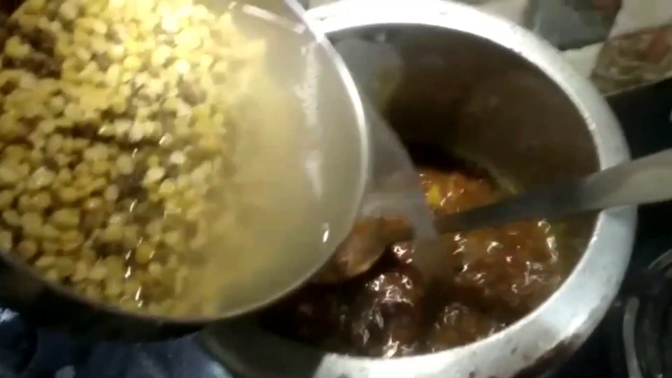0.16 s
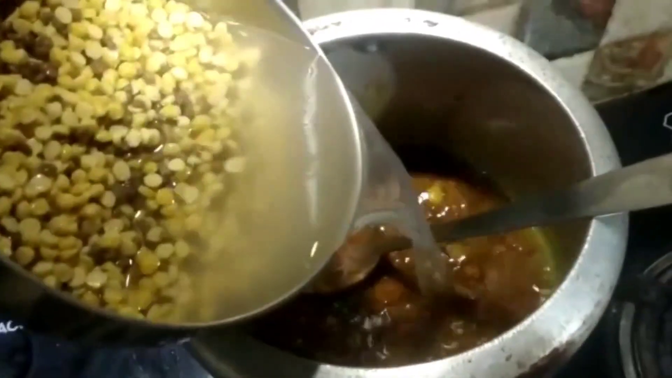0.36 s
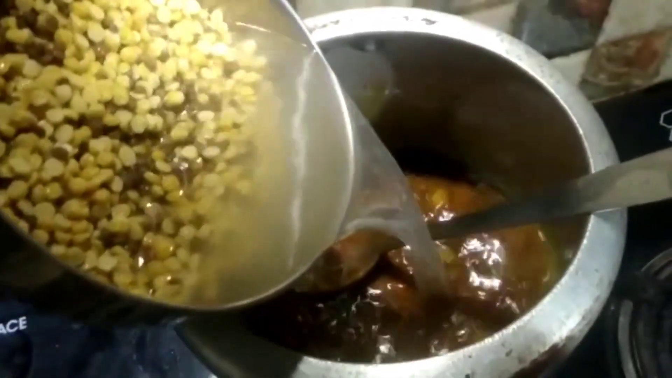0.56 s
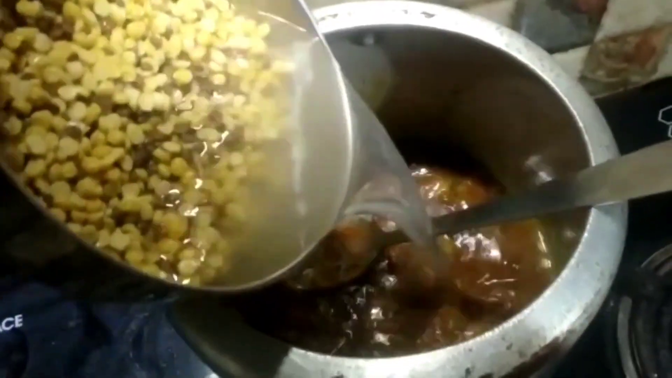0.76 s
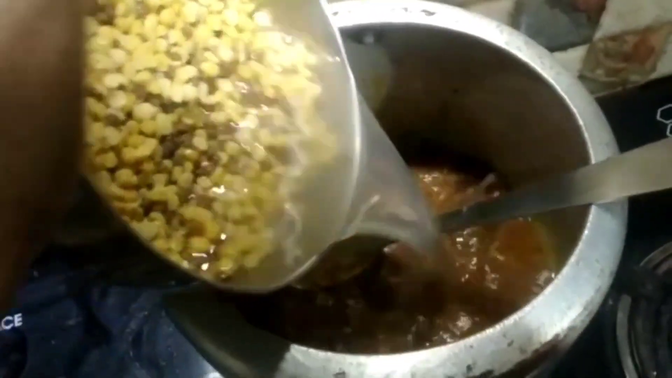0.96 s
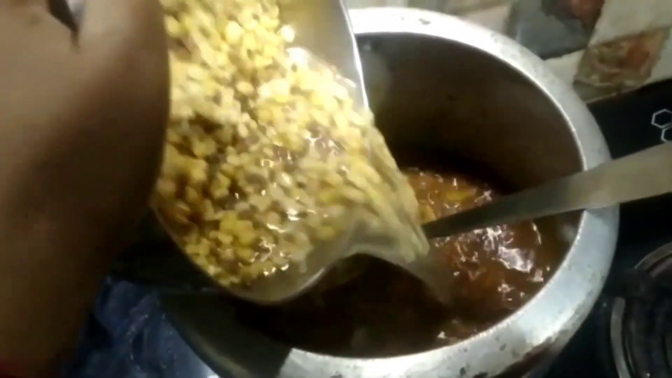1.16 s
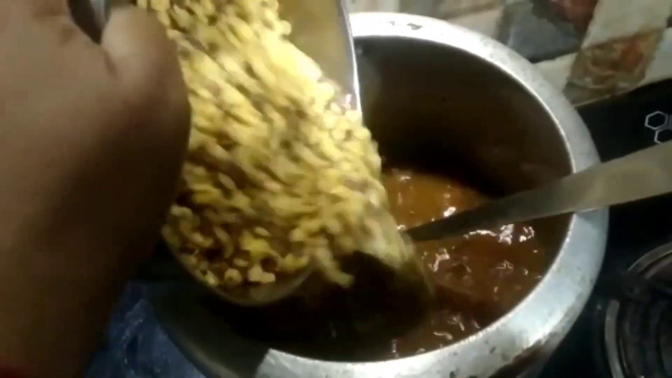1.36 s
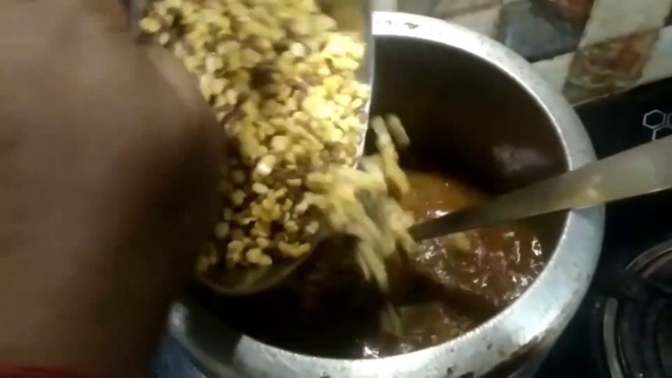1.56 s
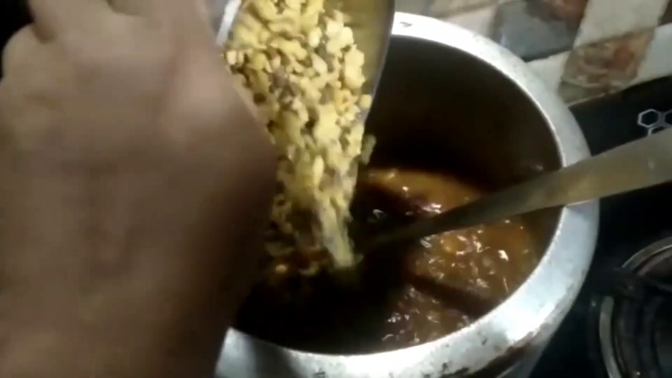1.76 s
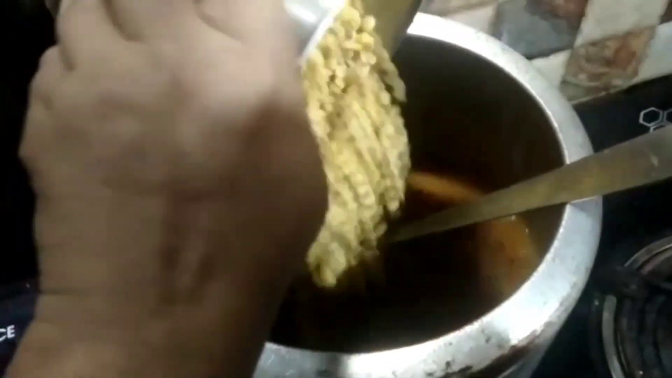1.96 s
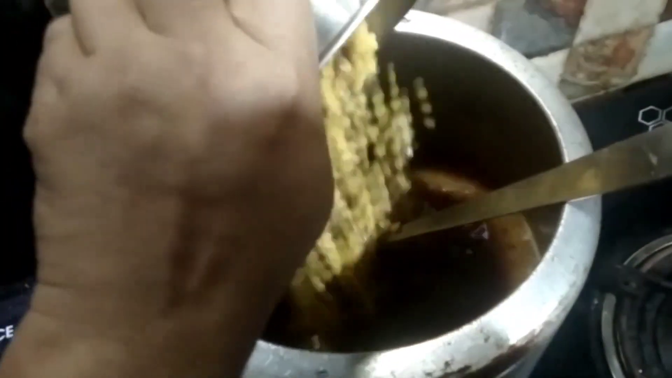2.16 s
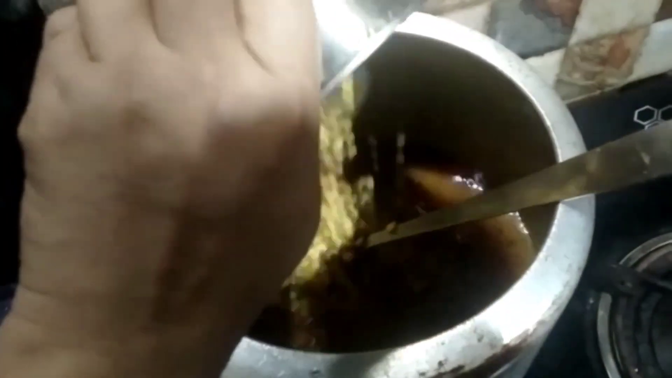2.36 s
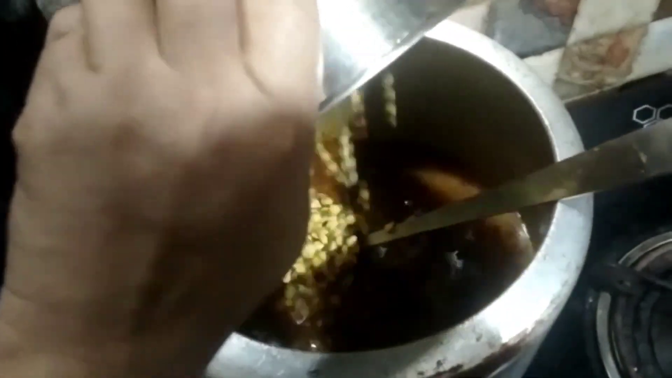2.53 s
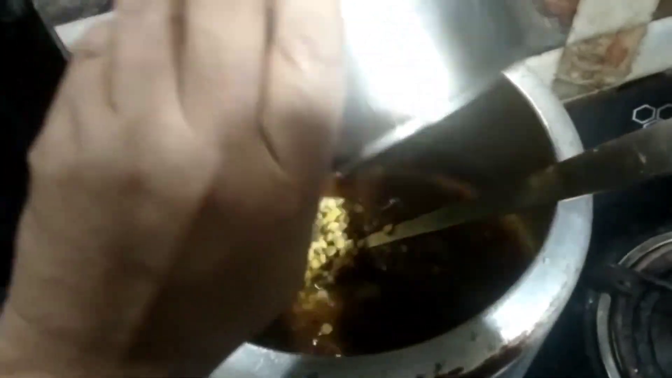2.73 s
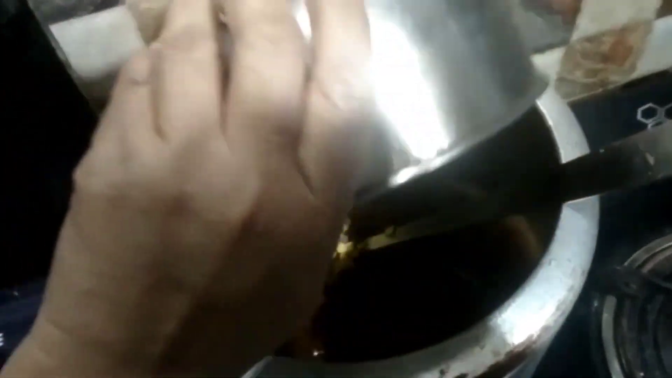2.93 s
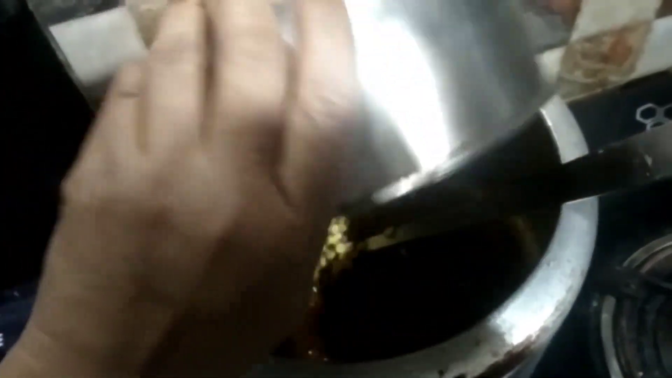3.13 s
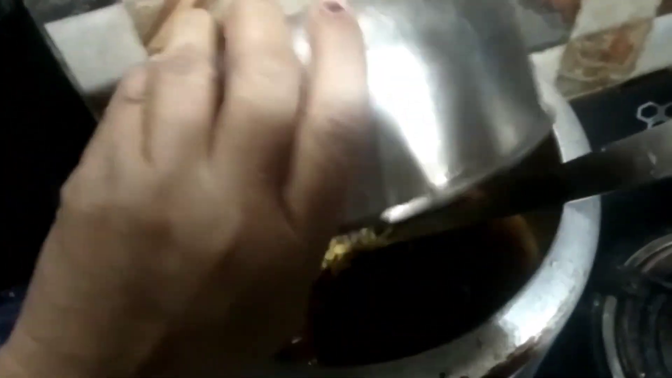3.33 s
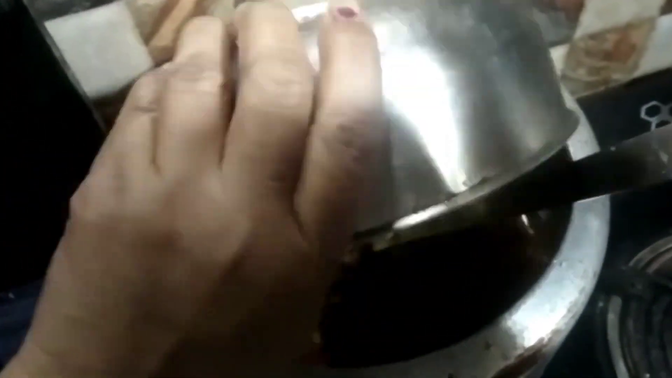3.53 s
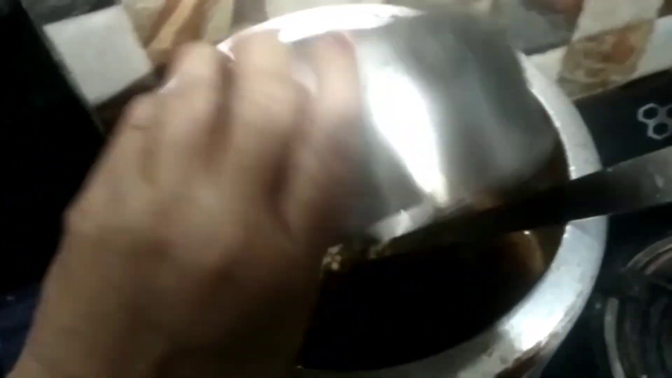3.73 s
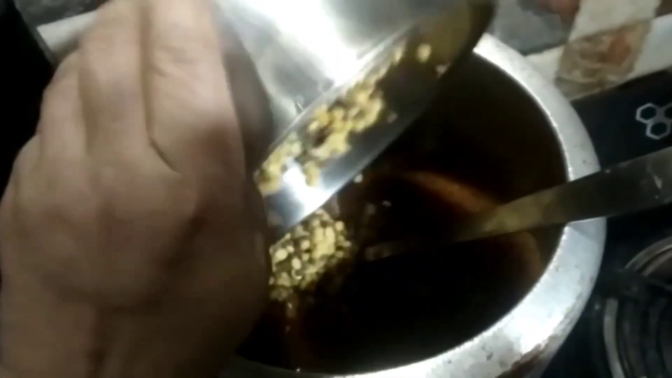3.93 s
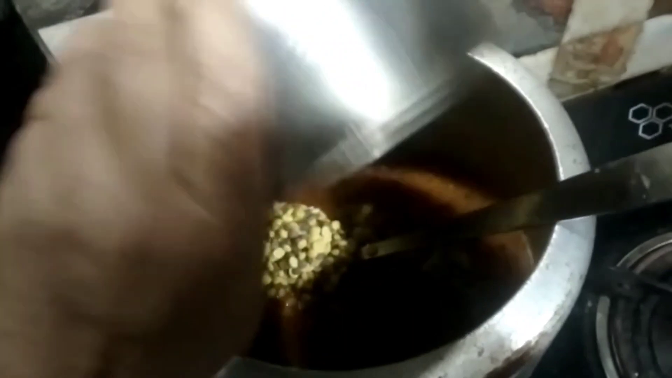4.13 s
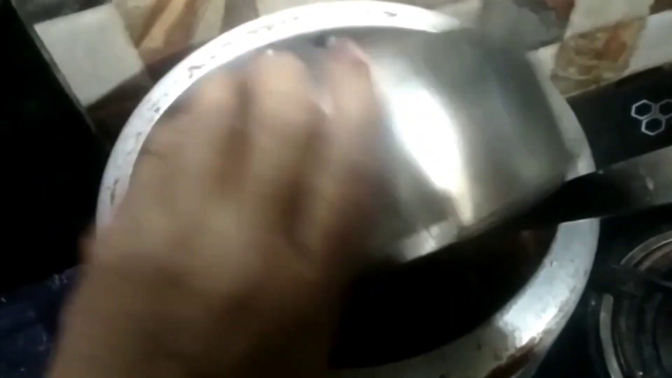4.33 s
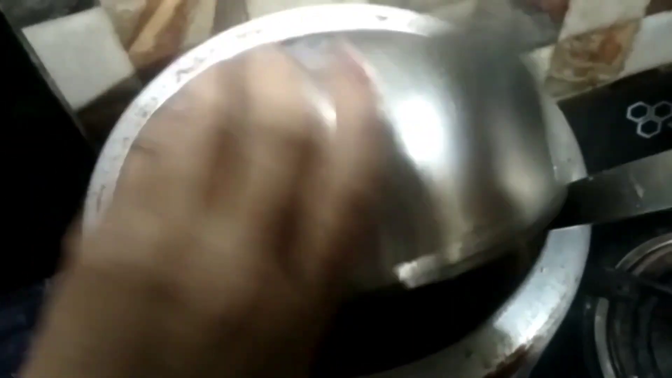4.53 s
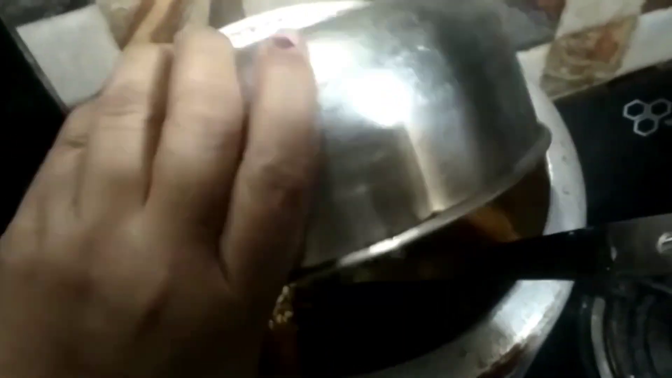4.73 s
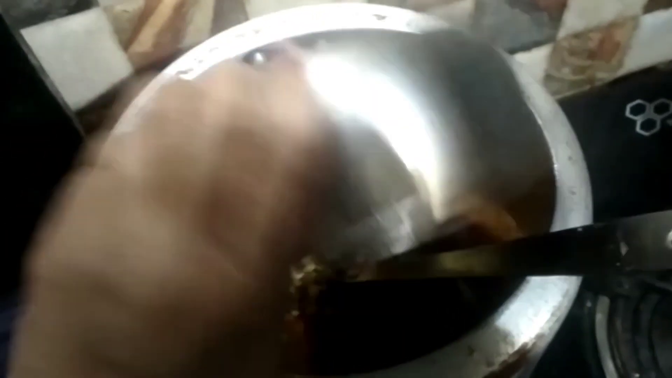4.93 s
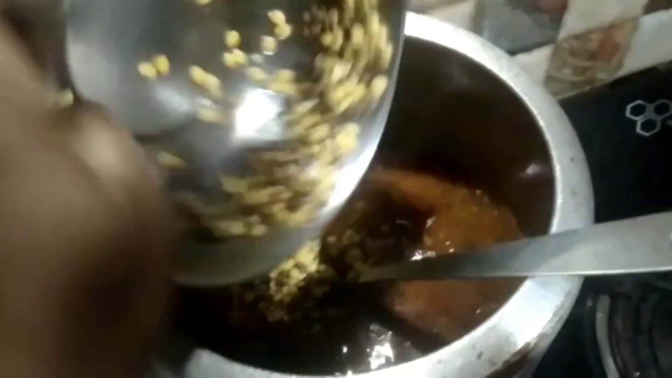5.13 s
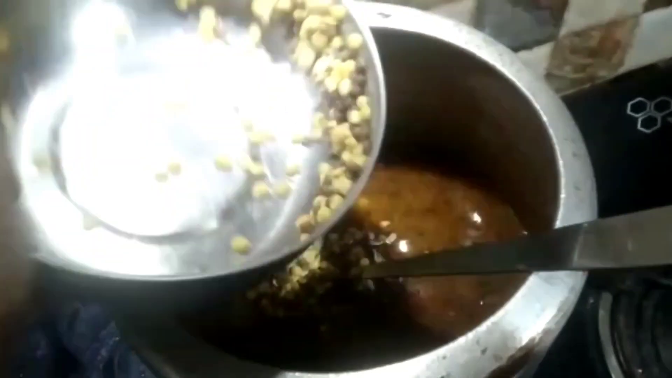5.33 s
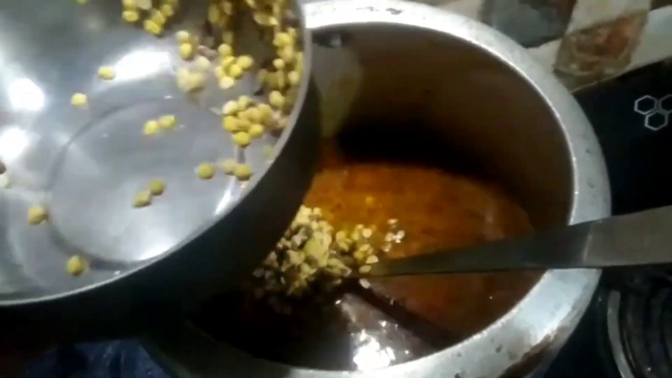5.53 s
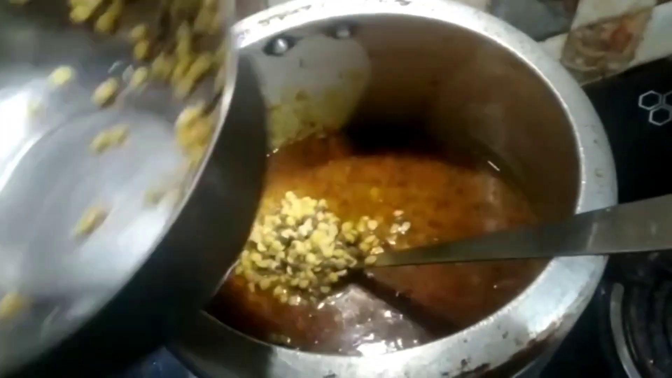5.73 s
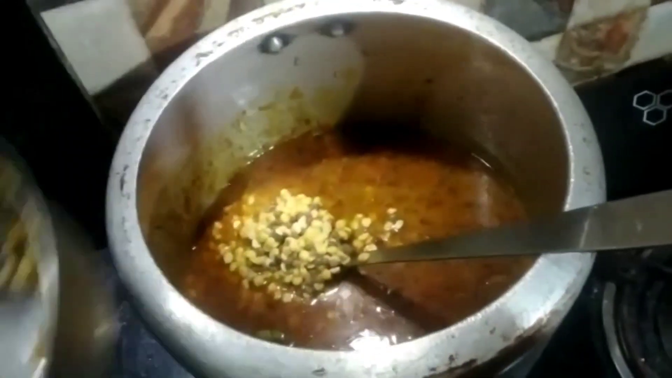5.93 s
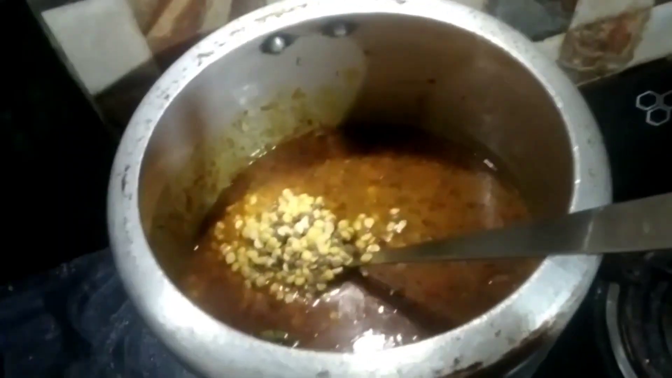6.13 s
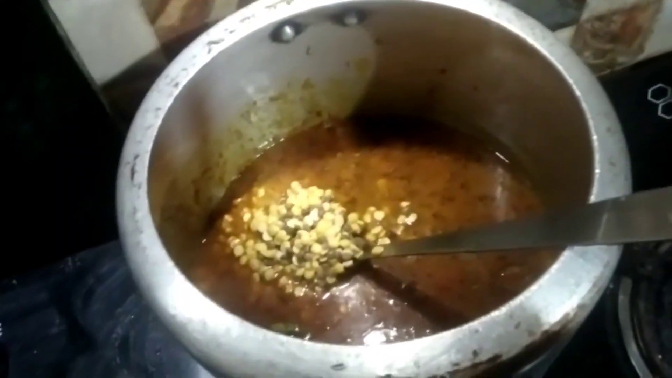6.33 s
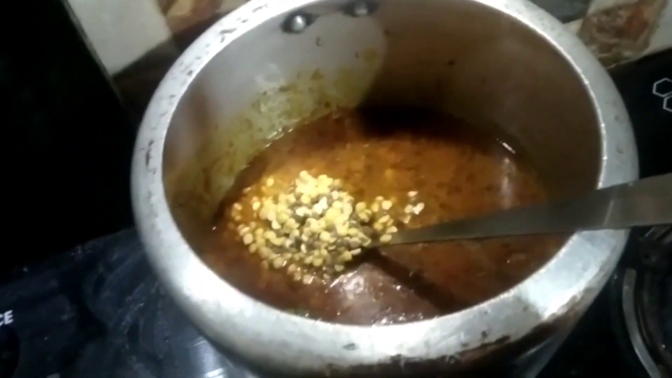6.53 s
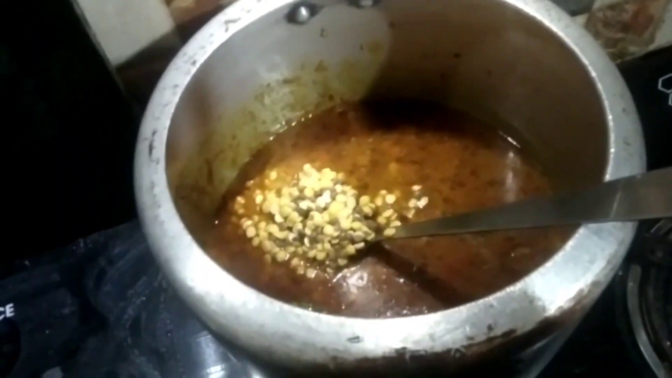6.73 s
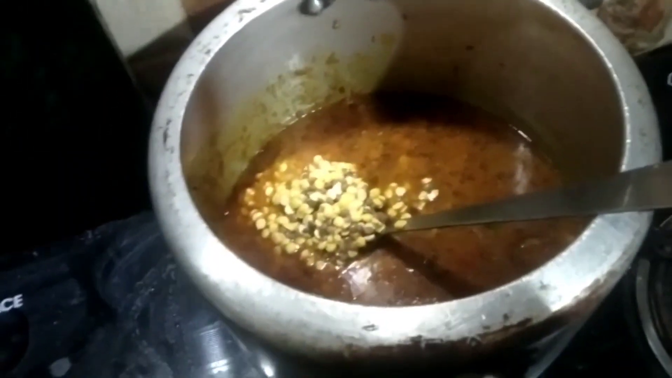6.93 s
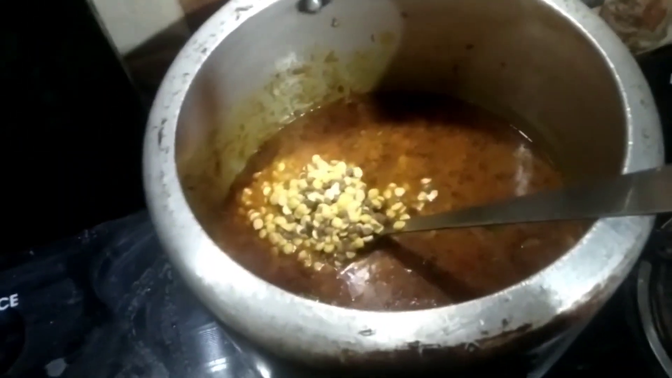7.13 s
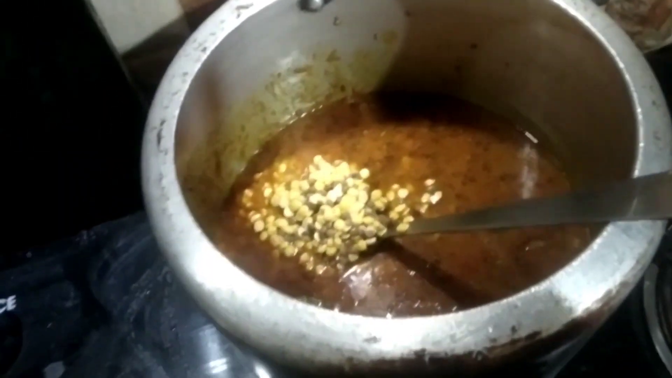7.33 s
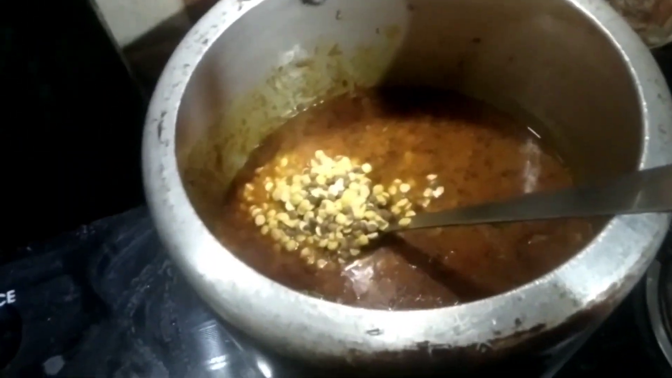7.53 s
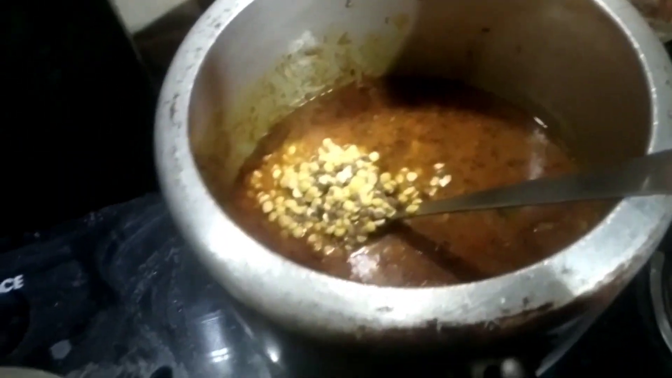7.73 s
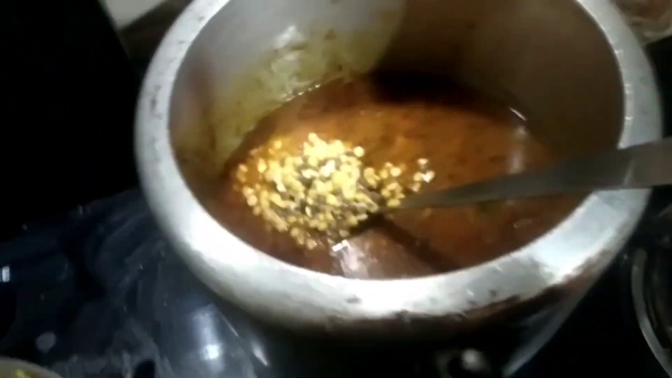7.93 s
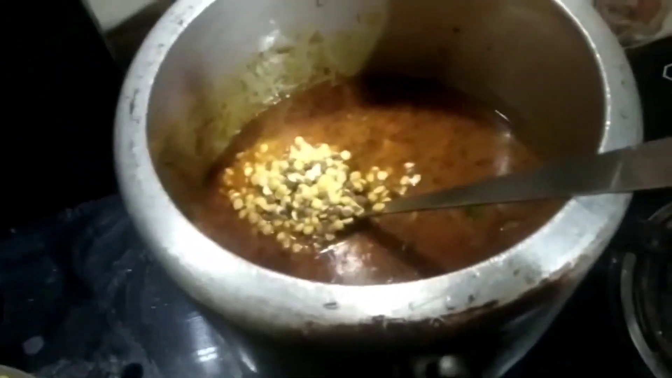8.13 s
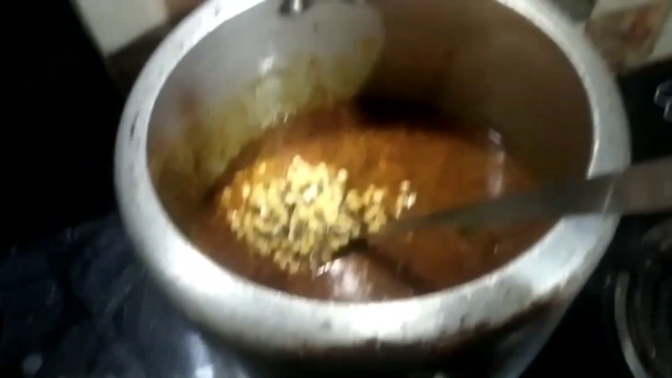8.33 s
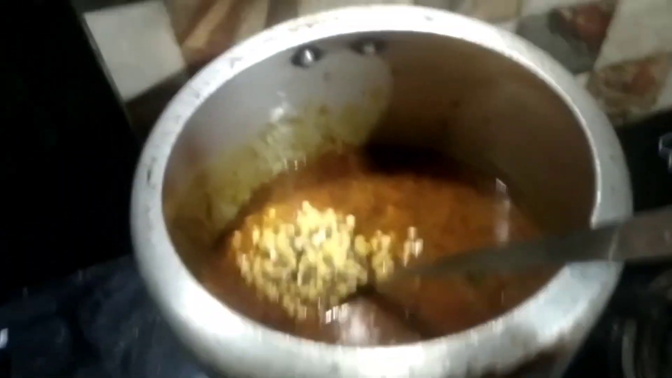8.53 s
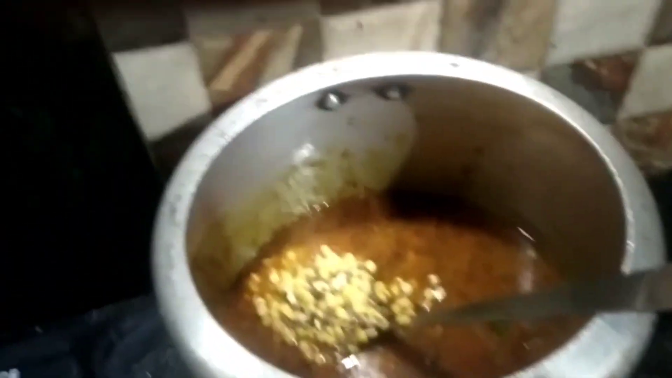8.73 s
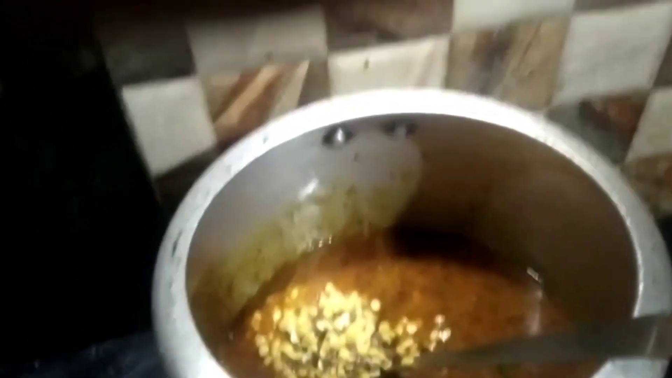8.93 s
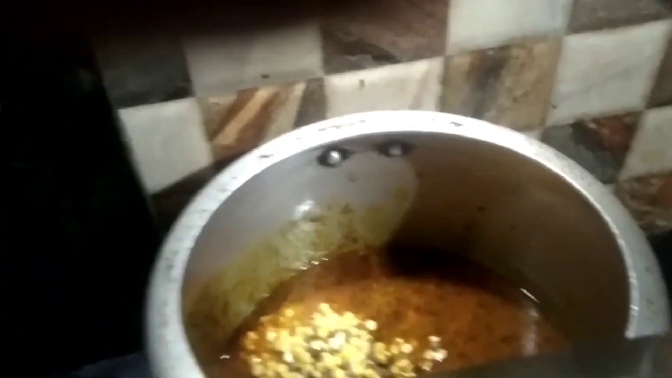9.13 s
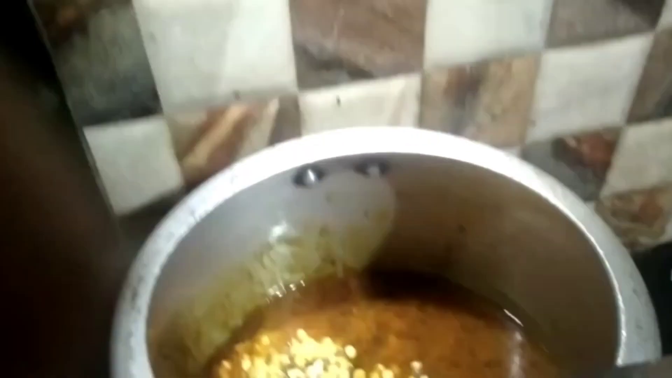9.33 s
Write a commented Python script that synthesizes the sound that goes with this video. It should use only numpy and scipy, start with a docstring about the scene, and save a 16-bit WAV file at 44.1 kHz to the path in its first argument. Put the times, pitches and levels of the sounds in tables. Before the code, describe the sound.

A fan drones steadily in a small kitchen, heard from two microphones just above the stove. From the start, water runs into a hot pressure cooker: a bright hiss flares and slowly cools, while the stream gurgles in surges with hollow plops, soft slaps and crackling spits. The water thins around 1.2 seconds; from 1.5 to 2.6, clumps of wet lentils slide in with splashes, fresh hiss and tiny ticks on steel. The sizzle sinks to a simmer. From about 3.1 the steel bowl touches the rim, then clanks hard in clusters near 3.75-4.0, 4.3-4.4 and 4.7, with short choked rings, scrapes and squeaks. A few lentils tick at 5.3 and a faint knock follows at 5.5. At 6.5 the bowl lands on the counter with a duller metallic clunk and small rattles to 6.7. Quiet simmering continues, with spits near 7.6 and 8.7 and a last light knock at 8.65.

```python
"""Throughout, a fan drones in a small kitchen: noise with narrow bands. Two close microphones listen.
Water from a steel bowl runs into a hot pressure cooker: hissing noise flares, air pockets ring as gliding tones.
Clumps of soaked lentils follow with splashes and fresh hiss; the sizzle sinks to a simmer.
The bowl is knocked against the rim and the spoon standing in the cooker: dying metal modes ring over noise.
It is set down on the counter with duller modes; the simmer goes on, with a late spit and a last light knock."""
import sys
import numpy as np
from scipy import signal
from scipy.fft import rfft, irfft, next_fast_len
from scipy.io import wavfile

SR = 44100
rng = np.random.default_rng(int(sys.argv[2]) if len(sys.argv) > 2 else 0)


def to_wav(s):
    """Save 16-bit WAV."""
    ch = np.atleast_2d(s).T  # columns
    pcm = np.round(np.clip(ch, -1, 1) * 32767)  # PCM
    wavfile.write(sys.argv[1], SR, pcm.astype(np.int16))


N = 418509
TIME = np.arange(N) / SR
CUTOFF_HZ = 15700  # top of the crowd of metal modes and of the finished sound
SHADOW_HZ = 3950  # above this pitch the two microphones hear differently


def from_db(db):
    """Turn decibels into gain."""
    return 10 ** (np.asarray(db) / 20)


def rms_one(x):
    """Scale a sound to unit power."""
    return x / np.sqrt(np.mean(x ** 2) + 1e-20)


def in_time(rows):
    """Read each column of a timed table at every sample."""
    s, *columns = np.transpose(rows)
    return [np.interp(TIME, s, column) for column in columns]


def at_hz(points, hz):
    """Read a table of (pitch, value) along log frequency."""
    at, value = np.transpose(points)
    return np.interp(np.log(hz + 1e-3), np.log(at), value)


def filtered(x, gain):
    """Apply a gain that depends on frequency."""
    size = next_fast_len(x.shape[-1])
    spectrum = rfft(x, size) * gain(np.fft.rfftfreq(size, 1 / SR))
    return irfft(spectrum, size)[..., :x.shape[-1]]


def coloured(x, spectrum):
    """Shape a sound with a table of decibels over frequency."""
    return filtered(x, lambda hz: from_db(at_hz(spectrum, hz)))


def white(size):
    """Make two unrelated noises of 0 dB per Hz."""
    return rng.standard_normal((2, size)) * np.sqrt(SR / 2)


def drift(rate, size=N):
    """Wander by chance with unit power, taking a new aim `rate` times a second."""
    knots = rng.standard_normal(4000)
    return rms_one(np.interp(TIME[:size] * rate, np.arange(len(knots)), knots))


def grains(per_s, spread_db):
    """Scatter uneven random clicks that reach each channel with a strength of their own."""
    born = rng.random(N) < per_s / SR
    sizes = from_db(spread_db * np.minimum(rng.exponential(1, N), 4))
    return rms_one(born * sizes * rng.standard_normal((2, N)))


def swell(middle_s, length_s):
    """Rise and fall in the shape of a bell curve."""
    return np.exp(-2 * ((TIME - middle_s) / length_s) ** 2)


def add(out, s, sound):
    """Mix a sound in, starting at the given second."""
    at = int(s * SR)
    out[:, at:at + sound.shape[1]] += sound[:, :N - at]


def two_places(hz):
    """Phases at two places: a quarter turn apart for long waves, with an added chance for short ones."""
    quarter_turn = np.array([[0], [np.pi / 2]])
    return quarter_turn + 2 * np.pi * rng.random((2, 1)) * (hz > SHADOW_HZ)


def ringing(hz, t60, t):
    """Ring one mode that dies by 60 dB in t60 seconds, starting at a chance phase."""
    phase = np.float32(2 * np.pi * (hz * t + rng.random()) + two_places(hz))
    return np.exp(-np.log(1000) * t / t60) * np.sin(phase)


def puffs(events, width, rise_s, t60):
    """Play short bursts of noise around a loose pitch; width is a share of that pitch."""
    out, t = np.zeros((2, N)), TIME[:SR // 4]
    for s, db, centre in events:
        puff = filtered(white(len(t)), lambda hz: 1 / (1 + ((hz / centre - centre / (hz + 1)) / width) ** 2))
        envelope = from_db(db - 60 * t / t60) * (1 - np.exp(-t / rise_s))
        add(out, s, envelope * rms_one(puff))
    return out


# the fan's smooth rush of air: pitch_hz, level_db (per Hz)
FAN_RUSH = [(20, -73), (55, -101), (85, -76.5), (130, -79), (165, -72), (250, -74.5), (370, -70),
            (480, -67), (680, -76.5), (1600, -73.5), (2100, -83), (3200, -80.5), (4500, -83), (9000, -118)]
# the fan's drone and the hollows it excites: pitch_hz, width_hz, level_db
FAN_DRONE = [(84.1, 5, -53.5), (115.5, 18.4, -48), (144.5, 2.5, -57.5), (203.9, 11, -46.5),
             (227.6, 11.7, -48), (257.5, 25, -49), (288, 6.2, -47), (312.2, 13.7, -46.5),
             (418.8, 31.5, -46.5), (778.5, 82, -47.5), (1072, 8.8, -55), (1780, 33, -53.5),
             (2227, 240, -55), (2543, 32, -57.5)]


def fan():
    """Moving air makes broad noise, and hollows pick out narrow, wavering bands of it."""
    def bands(hz):
        power = 0
        for centre, width, db in FAN_DRONE:
            power = power + from_db(db) ** 2 / width / (1 + (2 * (hz - centre) / width) ** 4)
        return np.sqrt(power)
    return coloured(white(N), FAN_RUSH) + filtered(white(N), bands)


# stray lentils skittering in the bowl: start_s, level_db (before rise and fading), pitch_hz
LENTIL_TICKS = [(1.779, -38, 9700), (2.238, -41, 11500), (2.477, -36, 7250), (2.478, -48, 12500),
                (5.268, -36, 5650), (5.27, -51, 12500), (5.52, -57, 12500), (8.65, -62, 12500)]


def skitters():
    """Hard little lentils tick on steel: very short bursts of mostly high noise."""
    return puffs(LENTIL_TICKS, width=0.3, rise_s=0.00046, t60=0.053)


# bubbles bursting on the hot wall: start_s, peak_db, pitch_hz
LOUD_SPITS = [(.906, -25, 3980), (.948, -29, 3950), (1.549, -32, 5640), (1.773, -24, 4600),
              (1.776, -27, 4850), (1.964, -25.5, 4160), (2.141, -30, 5300), (2.477, -30, 6740),
              (7.578, -37, 4960), (8.691, -35, 4930)]
SPIT_WAVER, SPIT_WAVER_PER_S = .035, 1200  # as a share of the pitch; new aims per second


def spits(count=45, until_s=2.5, small_db=-35, fading_db_per_s=3, low_hz=3900, high_hz=7500,
          rise_s=.003, t60=0.027):
    """Bubbles tick as they burst on the hot wall: a few loud ones, and many small ones during the pour."""
    out, t = np.zeros((2, N)), TIME[:SR // 20]
    small = []
    for when, size in rng.random((count, 2)):
        start_s = until_s * when
        small.append((start_s, small_db - fading_db_per_s * start_s, low_hz * (high_hz / low_hz) ** size))
    shape = (1 - np.exp(-t / rise_s)) ** 2 * from_db(-60 * t / t60)
    for s, db, hz in LOUD_SPITS + small:
        # the tearing film roughens the note
        pitch = hz * (1 + SPIT_WAVER * drift(SPIT_WAVER_PER_S, size=len(t)))
        phase = 2 * np.pi * (np.cumsum(pitch) / SR + rng.random((2, 1)))
        add(out, s, from_db(db) * shape / shape.max() * np.sin(phase))
    return out


# gulps of water and lentils slapping the gravy: start_s, level_db (before rise and fading), pitch_hz
GRAVY_SLAPS = [(.21, -30.5, 1410), (.435, -32, 1600), (.7, -37, 800), (.96, -48, 1400), (1.035, -37, 1190),
               (1.59, -41, 910), (1.785, -47, 1100), (2.135, -40, 1200), (2.215, -33.5, 1000),
               (2.485, -40, 900)]


def slaps():
    """A gulp slapping the gravy makes a soft, wide burst of noise."""
    return puffs(GRAVY_SLAPS, width=0.99, rise_s=.004, t60=0.24)


# air pockets closed in where the stream plunges:
# start_s, level_db (relative, before rise and fading), pitch_hz (before glide and waver)
AIR_POCKETS = [(.04, -20, 197), (.118, -19, 285), (.24, -31, 920), (.358, -26, 270), (.444, -23, 1530),
               (.486, -17, 200), (.515, -42, 330), (.69, -33, 447), (.72, -30, 380), (.728, -27, 617),
               (.735, -17, 303), (.815, -45, 830), (.924, -23, 287), (.992, -31, 758), (1.06, -38, 447),
               (1.14, -33, 221), (1.207, -43, 424), (1.36, -28, 765), (1.42, -38, 742), (1.638, -40, 418),
               (1.742, -27, 234), (1.76, -23, 420), (1.885, -31, 455), (2.178, -24, 295), (2.212, -24, 223),
               (2.24, -25, 800), (2.51, -24, 424)]


def plops(rise_s=0.0065, t60=0.15, glide_per_s=1.47, waver=0.042, level_db=-3.5):
    """A trapped pocket of air wobbles and rings, rising in pitch as it nears the surface."""
    out, t = np.zeros((2, N)), TIME[:SR // 5]
    for s, db, hz in AIR_POCKETS:
        pitch = hz * (1 + glide_per_s * t + waver * drift(130, size=len(t)))
        tone = np.sin(2 * np.pi * np.cumsum(pitch) / SR + np.array([[0], [np.pi / 2]]))
        envelope = from_db(level_db + db - 60 * t / t60) * (1 - np.exp(-t / rise_s))
        add(out, s, tone * envelope)
    return out


# clumps of wet lentils sliding in, which splash here and set the pot hissing in frying():
# middle_s, length_s, splash_db (relative, as in flow), hiss_db
LENTIL_CLUMPS = [(1.56, 0.17, -38.5, -40), (1.75, 0.21, -40, -40.5), (1.993, 0.86, -41.5, -45.5),
                 (2.267, 0.28, -39.5, -37), (2.535, 0.068, -36.5, -46), (3.62, 0.19, -51, -46)]
# the water runs off first, in surges as it sloshes in the bowl, then dries up; levels are relative
STREAM_DB, STREAM_SAG_DB_PER_S, STREAM_END_S, STREAM_RELEASE_DB_PER_S = -34.5, 2, 1.24, 39
SURGE_PERIOD_S, SURGE_DB = 0.237, 1.5


def flow():
    """Strength of what lands in the gravy: surging water, then clumps of lentils, added as power."""
    surge_db = SURGE_DB * np.cos(2 * np.pi * TIME / SURGE_PERIOD_S)
    release_db = STREAM_RELEASE_DB_PER_S * np.maximum(TIME - STREAM_END_S, 0)
    drying_db = STREAM_SAG_DB_PER_S * TIME + release_db
    water = from_db(STREAM_DB + surge_db - drying_db) ** 2
    clumps = sum((from_db(splash_db) * swell(s, length)) ** 2 for s, length, splash_db, _ in LENTIL_CLUMPS)
    return np.sqrt(water + clumps)


# colour of the splash inside the hollow cooker: pitch_hz, level_db (relative)
GRAVY_COLOUR = [(25, -71), (100, 12.5), (155, -8), (200, 16), (310, -7), (365, 3.5), (430, 11.5),
                (620, -6.5), (790, 4), (1250, -9.5), (1550, 4), (2100, -10.5), (3300, 2), (5000, -101)]


def pour(level_db=2.0, bubbles_per_s=45, cycles=22, splash_db=4.0, slosh_db=1.0):
    """The stream traps bubbles of 14 sizes; they ring over its splash inside the hollow of the cooker."""
    bubbles = np.zeros((2, N))
    for hz in np.geomspace(250, 3000, 14):
        # a resonator that fades by 60 dB in `cycles` periods, struck bubbles_per_s times a second
        radius = from_db(-60 * hz / (cycles * SR))
        angle = 2 * np.pi * hz / SR
        births = rng.random(1200) * 1200 / bubbles_per_s * SR
        strengths = rng.standard_normal((2, len(births)))
        clicks = np.zeros((2, N))
        clicks[:, births[births < N].astype(int)] = strengths[:, births < N]
        resonance = [1, -2 * radius * np.cos(angle), radius * radius]
        rung = signal.lfilter([1, 0, -1], resonance, clicks + 1e-18)
        bubbles += np.sqrt(hz) * rms_one(rung)
    bubbles = rms_one(coloured(bubbles, GRAVY_COLOUR))
    splash = rms_one(coloured(grains(1500, spread_db=-0.5), GRAVY_COLOUR))
    mixed = rms_one(bubbles + from_db(splash_db) * splash)
    return flow() * from_db(level_db + slosh_db * drift(22.28)) * mixed


# colours of the hiss and of the fine spray above it: pitch_hz, level_db (relative)
HISS_COLOUR = [(30, -21), (90, -4.5), (1800, -6), (2600, -8), (3100, -46), (3550, -10.5), (4300, 2.5),
               (5300, 3), (6500, -1), (7700, -5), (8300, -21.5), (10000, -88)]
SPRAY_COLOUR = [(7500, -64), (8800, 6.5), (11000, 5), (14000, 1), (16000, -18)]
# the simmer that remains, as the microphones move about the cooker:
# time_s, level_db, left_minus_right_db (treble of all the frying)
SIMMER_PATH = [(0, -35.5, 2), (2.6, -43, 1), (3.4, -44, -2), (5.0, -46, -3.5), (7.8, -46.5, -5.5),
               (8.15, -46.5, -6), (9.1, -46, -7.5), (9.45, -49, -6)]
# the first water flares up on the hot metal and cools it at a steady rate
FLARE_DB, COOLING_DB_PER_S = -25, 12
# fine spray relative to the hiss
FLARE_SPRAY_DB, CLUMP_SPRAY_DB, SIMMER_SPRAY_DB = -18.5, -19, -29


def frying(bursts_per_s=3500, spread_db=-1.0, steam_db=4.5, flutter_db=1.5):
    """Countless steam bubbles burst in the oil over a smooth jet of steam; flare, clumps and simmer add power."""
    simmer_db, pan_db = in_time(SIMMER_PATH)
    simmer = from_db(simmer_db) ** 2
    flare = from_db(FLARE_DB - COOLING_DB_PER_S * TIME) ** 2
    clumps = sum((from_db(hiss_db) * swell(s, length)) ** 2 for s, length, _, hiss_db in LENTIL_CLUMPS)
    hiss = np.sqrt(flare + clumps + simmer)
    spray_power = flare * from_db(FLARE_SPRAY_DB) ** 2
    spray_power = spray_power + clumps * from_db(CLUMP_SPRAY_DB) ** 2
    spray_power = spray_power + simmer * from_db(SIMMER_SPRAY_DB) ** 2
    crackle = grains(bursts_per_s, spread_db) + from_db(steam_db) * rms_one(white(N))
    crackle = crackle * from_db(flutter_db * drift(45))
    sound = hiss * rms_one(coloured(crackle, HISS_COLOUR))
    sound = sound + np.sqrt(spray_power) * rms_one(coloured(crackle, SPRAY_COLOUR))
    return shaded(microphones(sound), pan_db)


# the bowl's edge sliding briefly on the rim: start_s, level_db (before rise and fading), pitch_hz
RIM_SCRAPES = [(3.36, -34.5, 6300), (4.725, -32, 6050)]


def scrapes():
    """An edge sliding on the rim makes a short burst of noise around a high pitch."""
    return puffs(RIM_SCRAPES, width=0.13, rise_s=0.011, t60=0.19)


# the edge sticking and slipping on rim or counter:
# start_s, length_s (until release), level_db, pitch_hz (before waver)
EDGE_SQUEAKS = [(3.772, .018, -28, 2340), (3.970, .026, -18.5, 645), (4.703, .025, -23, 650),
                (4.752, .012, -33, 5650), (4.754, .043, -30, 2187), (4.757, .028, -36, 6740),
                (4.771, .013, -30, 5350), (6.689, .010, -36, 7200)]


def squeaks(waver=0.013, attack_s=0.0013, release_db_per_s=1100):
    """Friction keeps one mode of the bowl singing for a moment."""
    out, t = np.zeros((2, N)), TIME[:SR // 8]
    for s, length, db, hz in EDGE_SQUEAKS:
        release_db = release_db_per_s * np.maximum(t - length, 0)
        level = from_db(db - release_db) * (1 - np.exp(-t / attack_s))
        pitch = hz * (1 + waver * drift(118, size=len(t)))
        phase = 2 * np.pi * np.cumsum(pitch) / SR + two_places(hz)
        add(out, s, level * np.sqrt(2) * np.sin(phase))
    return out


# what colours a blow: pitch_hz, base_db, thud_share (0 to 1), hardness_share (0 to 1)
BLOW_TONE = [(396, 0.5, 0.85, 0.15), (920, -1.5, 0.065, 0.033), (2420, -5, 0.025, 0.16),
             (5700, -2.5, 0.027, 0.8)]
# the bowl bounces back on its flank, duller than its edge struck: pitch_hz, level_db (added)
FLANK_TONE = [(420, 5), (950, 3), (2300, 7), (5200, 2.5)]
# each contact favours a band around its own pitch: lift in dB, and width as a share of the pitch
CONTACT_DB, CONTACT_WIDTH = 6.5, 0.095


def bouncing(strikes, gap_s, count, uneven=0.16):
    """A blow is one hard contact and some uneven bounces, each losing energy: (second, tone) of every contact."""
    hz = np.geomspace(60, 16000, 100)
    at, *columns = np.transpose(BLOW_TONE)
    base_db, thud_share, hard_share = [np.interp(np.log(hz), np.log(at), column) for column in columns]
    contacts = []
    for s, db, thud_db, hardness_db, loss_db, contact_hz, *_ in strikes:
        body = db + base_db + thud_share * thud_db + hard_share * hardness_db
        edge = CONTACT_DB * np.exp(-.5 * (np.log(hz / contact_hz) / CONTACT_WIDTH) ** 2)
        contacts.append((s, np.column_stack([hz, body + edge])))
        for k in range(1, count + 1):
            late_s = gap_s * (k + uneven * rng.uniform(-0.994, 1))
            bounce = body + at_hz(FLANK_TONE, hz) - k * loss_db
            contacts.append((s + late_s, np.column_stack([hz, bounce])))
    return contacts


CRASH_T60_S, CRASH_T60_SPREAD = 0.05, 0.36  # middle ring time; spread of its natural logarithm


def crowd(t, count):
    """Many unevenly spaced, short-lived modes of one vessel, together 0 dB per Hz: modes x time, complex."""
    spacing = CUTOFF_HZ / count
    hz = spacing * (np.arange(count) + rng.random(count))
    t60 = CRASH_T60_S * np.exp(CRASH_T60_SPREAD * rng.standard_normal(count))
    phase = np.float32(2 * np.pi * np.outer(hz, t))
    dying = np.exp(np.float32(-np.log(1000) * np.outer(1 / t60, t)))
    return float(np.sqrt(2 * spacing)) * dying * (np.cos(phase) + 1j * np.sin(phase))


# the instant of contact cracks above the crash, and the kitchen answers for longer
CRACK_DB, CRACK_T60_S = -9.5, 0.018
KITCHEN_DB, KITCHEN_T60_S = -14, 0.29
BLOW_RISE_S = .0009  # struck steel takes this long to start ringing
SWELL_CYCLES = 0.9  # the main modes swell over about this many of their own cycles


def blows(contacts, modes, crash, level_db, vary_db, buzz_db, detune, count):
    """Struck steel cracks, then its main modes ring over a crowd of lesser ones; the contact sets the tone."""
    out, t = np.zeros((2, N)), TIME[:SR // 4]
    crack = from_db(CRACK_DB - 60 * t / CRACK_T60_S)
    kitchen = from_db(KITCHEN_DB - 60 * t / KITCHEN_T60_S)
    dying = np.hypot(crack, kitchen)
    lesser = crowd(t, count)
    for s, tone in contacts:
        # the vibrating edge chatters on what it hit
        buzz = rms_one(from_db(buzz_db * drift(295, size=len(t))))
        turns = np.complex64(np.exp(2j * np.pi * rng.random((2, count))))
        clang = (turns @ lesser).real
        raw = white(len(t)) * dying + clang
        sound = filtered(raw, lambda hz: from_db(at_hz(crash, hz) + at_hz(tone, hz))) * buzz
        for hz, db, t60 in modes:
            strength = from_db(db + at_hz(tone, hz) + vary_db * rng.standard_normal())
            pitch = hz * (1 + detune * rng.standard_normal())  # grip and pressure shift the modes a little
            sound += strength * ringing(pitch, t60, t) * (1 - np.exp(-t * hz / SWELL_CYCLES))
        swelling = 1 - np.exp(-t / BLOW_RISE_S)
        fade_out = np.minimum(1, 2 * (1 - t / t[-1])) ** 2
        add(out, s, sound * swelling * fade_out)
    return from_db(level_db) * out


# bowl set down on the counter (levels relative):
# start_s, strength_db, thud_db, hardness_db, loss_per_bounce_db, contact_pitch_hz
COUNTER_HITS = [(6.495, -20, -3, 3, 3.7, 7440), (6.666, -32, -4, -4, 18, 1500),
                (6.673, -27.5, -11, -6, 20, 2130), (6.692, -41, 15, 1, 14, 1200),
                (8.655, -44.5, 7, 1, 6, 5000)]
# main modes of the bowl on the counter: pitch_hz (before detune), level_db (relative), t60_s
COUNTER_RING = [(307.4, -2.5, 0.41), (381, -13, .25), (536, -8, 0.19), (600, -6, 0.14), (715, -15, 0.22),
                (734, -16, 0.26), (814, -15, 0.16), (920, -7, 0.17), (1170, -12, 0.17), (1217, -16, 0.21),
                (1540, -8, 0.12), (1500, -1, 0.13), (1830, -3.5, .1), (2150, -19, .2), (2370, -14, 0.17),
                (6000, -9, .16), (6060, -13, 0.19), (7200, -10.5, 0.13), (7470, -19, 0.13)]
# the crowd of short-lived modes between them: pitch_hz, level_db (per Hz, relative)
COUNTER_CLATTER = [(60, -65), (200, -66), (350, -26.5), (900, -22.5), (1500, -26.5), (2100, -30),
                   (2800, -39), (3300, -29), (4900, -45), (6000, -33), (6400, -41), (7500, -38),
                   (8600, -55), (16000, -78)]


def counter_knocks():
    """The bowl lands on the counter, with three bounces after each blow."""
    contacts = bouncing(COUNTER_HITS, gap_s=.0085, count=3)
    return blows(contacts, COUNTER_RING, COUNTER_CLATTER, level_db=1.5, vary_db=-4.0, buzz_db=1.5,
                 detune=0.0049, count=260)


# bowl against cooker and spoon, also played by bell() (levels relative):
# start_s, strength_db, thud_db, hardness_db, loss_per_bounce_db, contact_pitch_hz,
# bowl_ring_db, choked_after_s
RIM_HITS = [(3.081, -32, -1, -19, 24, 780, -54, .04), (3.343, -31.5, -5, -13, 5, 1090, -40, .04),
            (3.533, -37, 7, -8, 10, 790, -39, .04), (3.753, -18, 9.5, 0, 13, 6700, -21, .11),
            (3.798, -33, 11.5, -10, 5, 650, -32, .05), (3.839, -37.5, 16.5, 5, 7, 6800, -28, 0.038),
            (3.889, -38.5, 6, -5, 15, 6500, -41, .02), (3.964, -27, -11, -11, 13, 1520, -37, .04),
            (3.969, -21, -1, -23, 10, 1080, -35, .04), (4.290, -30.5, 0, -17, 11, 830, -36, .021),
            (4.33, -23, -5.5, -0.5, 11, 4600, -19.5, 0.047), (4.368, -31.5, -2, -5, 18, 1000, -33, 0.025),
            (4.402, -15, -21, 0.5, 16, 5340, -17.5, 0.032), (4.422, -28, -13, -3, 22, 5600, -20, 0.03),
            (4.686, -18.5, -6.5, 7, 16, 4640, -16, 0.14), (4.693, -27.5, -9, 4, 4, 5500, -30, 0.045),
            (4.701, -24, 13.5, 0, 25, 1020, -27, .05), (4.733, -25, -9, 4, 7, 3200, -24, 0.062),
            (5.495, -38, 10, -9, 26, 606, -55, .05)]
# main modes of bowl and cooker pressed together: pitch_hz (before detune), level_db (relative), t60_s
RIM_RING = [(305, -9, .15), (372, 0, .07), (402, 1, .09), (506, -7, .2), (645, -10, .22), (750, -12, .22),
            (935, -4, .08), (1005, -2, .11), (3555, -12, .11), (3630, -9, .11), (4175, -12, .1),
            (4415, -16, .12), (4650, -8, .08), (4712, -13, .12), (5085, -8, .1), (5335, -7, .11),
            (5400, -12, .09), (5645, -10, .11), (5908, -14, .14), (6105, -14, .11), (6520, -14, .11),
            (6740, -13, .12), (7095, -14, .12), (7650, -17, .08)]
# the crowd of short-lived modes between them: pitch_hz, level_db (per Hz, relative)
RIM_CLATTER = [(60, -57), (200, -50), (400, -42), (650, -36.5), (950, -23.5), (1350, -37), (1900, -27.5),
               (2400, -32), (2800, -29), (3400, -23.5), (5000, -33.5), (7500, -38.5), (8500, -49),
               (10000, -47), (16000, -67)]


def rim_knocks():
    """The bowl hits the cooker's rim or the spoon, with two bounces after each blow."""
    contacts = bouncing(RIM_HITS, gap_s=0.013, count=2)
    return blows(contacts, RIM_RING, RIM_CLATTER, level_db=0.0, vary_db=0.0, buzz_db=3.5,
                 detune=0.0004, count=150)


# modes of the bowl ringing freely: pitch_hz, level_db (relative), t60_s (until choked)
FREE_BOWL_MODES = [(2186, -6, .27), (2269, -6, .27), (2346, -2.5, .25), (2410, -14, .14), (2508, -9, .26),
                   (2620, -14, .13), (2815, -16, .12), (3150, -16, .1)]
# the ring blooms slowly, until the bowl is pressed back on the rim
BLOOM_S, CHOKE_DB_PER_S = 0.0055, 902


def bell(vary_db=-0.5, chatter_db=0.0):
    """After each blow the bowl springs clear and rings, until it lands on the rim again."""
    out, t = np.zeros((2, N)), TIME[:SR // 3]
    for s, *_, ring_db, free_s in RIM_HITS:
        ring = np.zeros((2, len(t)))
        for hz, db, t60 in FREE_BOWL_MODES:
            ring += from_db(db + vary_db * rng.standard_normal()) * ringing(hz, t60, t)
        ring = ring * from_db(chatter_db * drift(253, size=len(t)))  # at 0 dB the ring stays smooth
        choke_db = CHOKE_DB_PER_S * np.maximum(t - free_s, 0)
        add(out, s, ring * (1 - np.exp(-t / BLOOM_S)) * from_db(ring_db - choke_db))
    return out


def shaded(x, pan_db):
    """The housing shades one microphone from the cooker, so only the treble leans to one side."""
    treble = filtered(x, lambda hz: np.clip((hz - SHADOW_HZ) / 200 + .5, 0, 1))
    return x + treble * (from_db(np.outer([.5, -.5], pan_db)) - 1)


# share of the sound that the two microphones hear differently: pitch_hz, level_db (held to -3 at most)
HEARD_APART = [(60, -16), (250, -18), (450, -4.5), (950, -7), (1500, -18.5), (2300, -14.5), (2800, -28),
               (3400, -109), (3750, -28.5), (4100, 15.5), (16000, -7)]
# balance of the two microphones: pitch_hz, left_minus_right_db
LEFT_RIGHT = [(100, -0.4), (400, 1.5), (900, 4), (1600, 1.5), (2800, 0), (3800, 0), (5000, 0), (7500, -4),
              (12000, 2.5)]
PORT_LAG = 3  # samples: the left is delayed and the right advanced by this much


def microphones(field):
    """Both share the lows and hear highs apart; the right hears first, which hollows their summed low treble."""
    def unshared(hz):
        return np.clip(from_db(at_hz(HEARD_APART, hz)), 0, np.sqrt(.5))
    shared = filtered(field[0], lambda hz: np.sqrt(1 - unshared(hz) ** 2))
    apart = filtered(field[1], unshared)
    left = filtered(shared + apart, lambda hz: from_db(at_hz(LEFT_RIGHT, hz) / 2))
    right = filtered(shared - apart, lambda hz: from_db(-at_hz(LEFT_RIGHT, hz) / 2))
    return np.array([np.roll(left, PORT_LAG), np.roll(right, -PORT_LAG)])


def scene():
    """Mix everything at the stove, heard from just above the cooker."""
    gravy = pour() + plops() + slaps()
    bowl = scrapes() + squeaks() + counter_knocks() + rim_knocks() + bell()
    return microphones(fan() + skitters() + spits() + gravy + bowl) + frying()


CEILING = .75  # rounded peaks stay below this amplitude, before the top is cut


def record(dry, low_cut_hz=45):
    """Remove the rumble, round the loudest peaks and cut the top steeply."""
    low_cut = signal.butter(2, low_cut_hz, "high", fs=SR, output="sos")
    lean = signal.sosfilt(low_cut, dry)
    rounded = lean / (1 + (lean / CEILING) ** 4) ** (1 / 4)
    top_cut = signal.ellip(10, .2, 90, CUTOFF_HZ, fs=SR, output="sos")
    return signal.sosfilt(top_cut, rounded)


dry = scene()
out = record(dry)
to_wav(out)
```